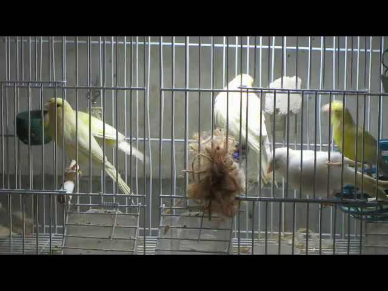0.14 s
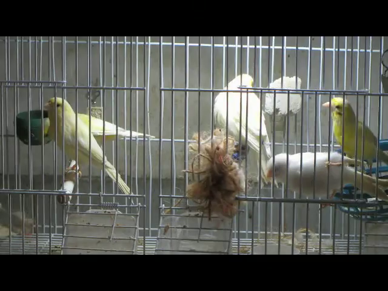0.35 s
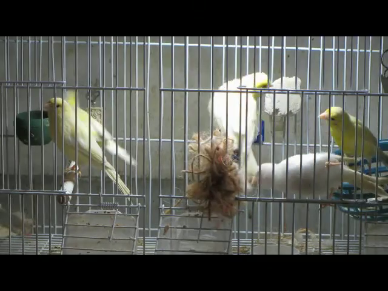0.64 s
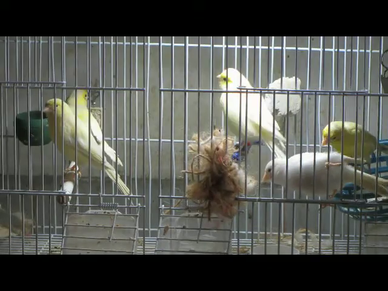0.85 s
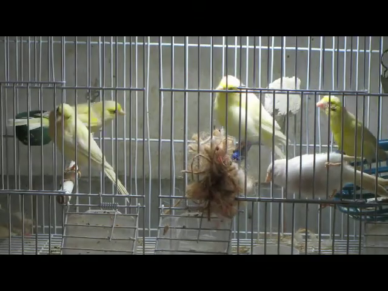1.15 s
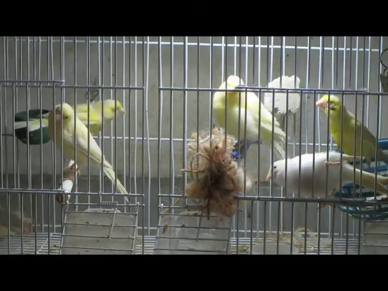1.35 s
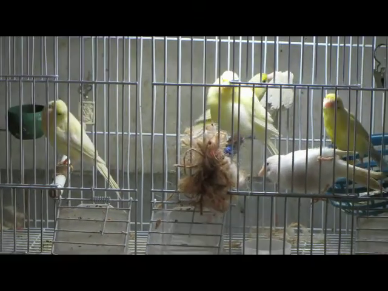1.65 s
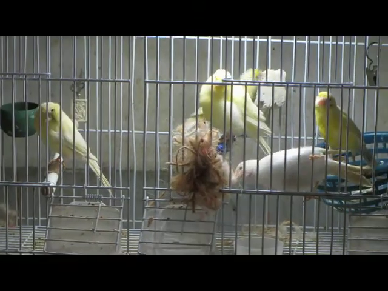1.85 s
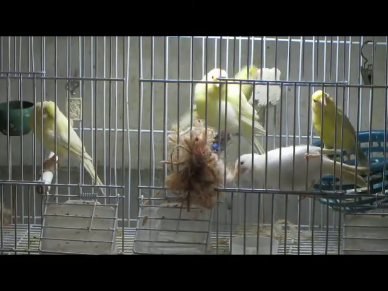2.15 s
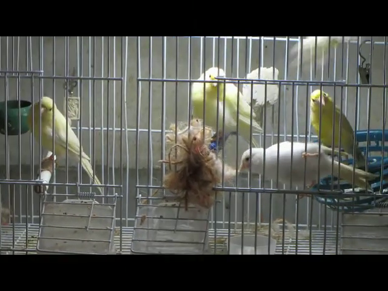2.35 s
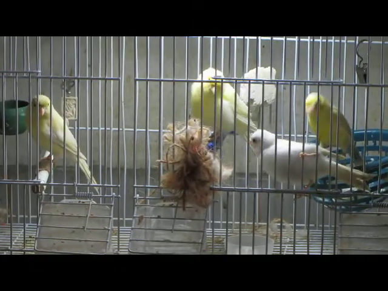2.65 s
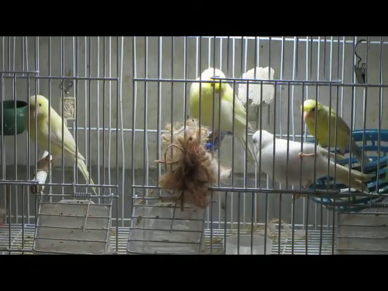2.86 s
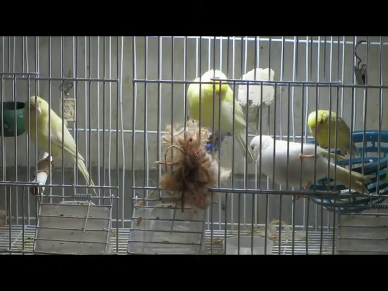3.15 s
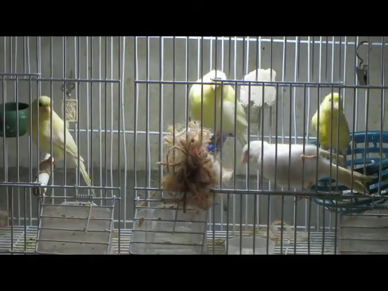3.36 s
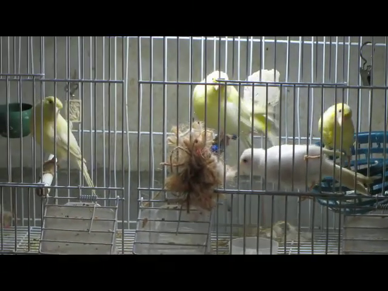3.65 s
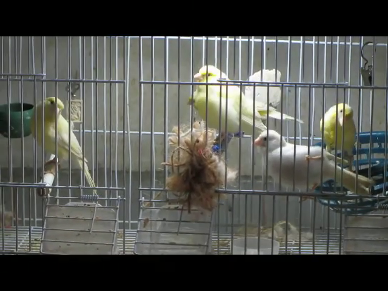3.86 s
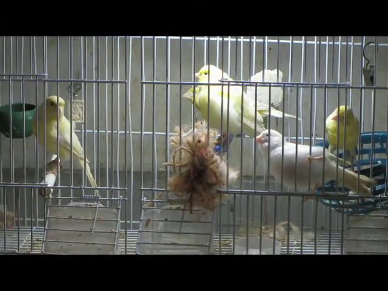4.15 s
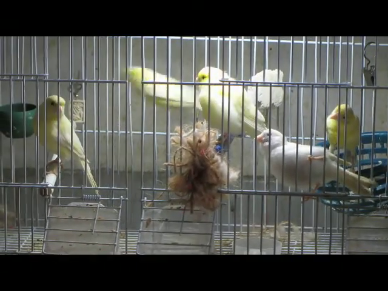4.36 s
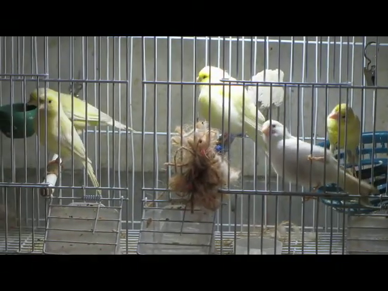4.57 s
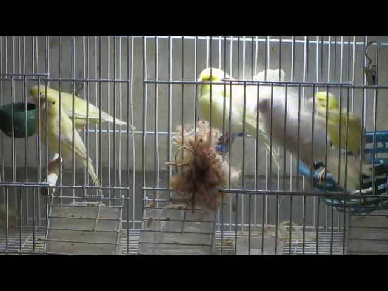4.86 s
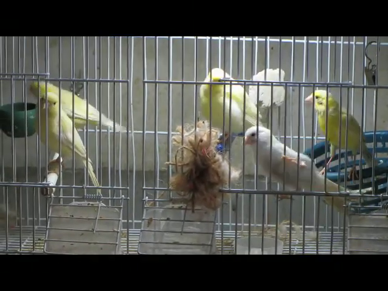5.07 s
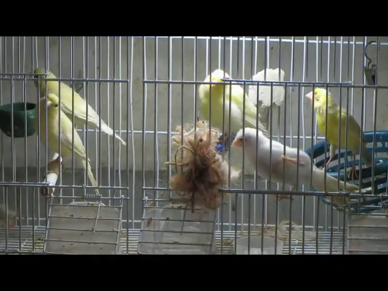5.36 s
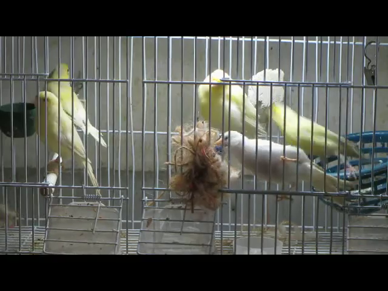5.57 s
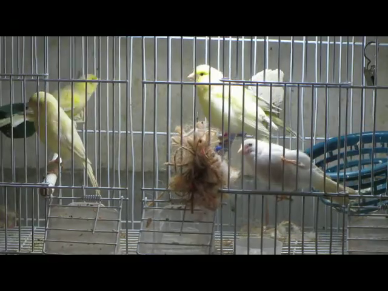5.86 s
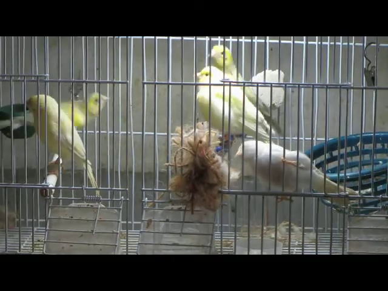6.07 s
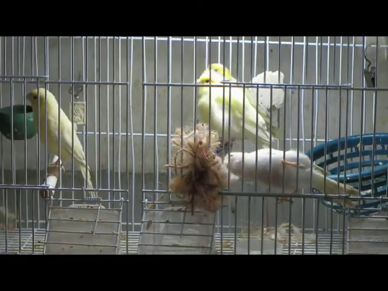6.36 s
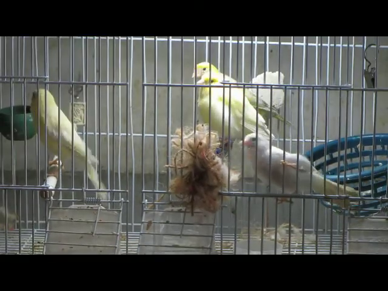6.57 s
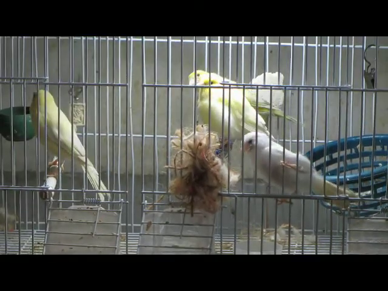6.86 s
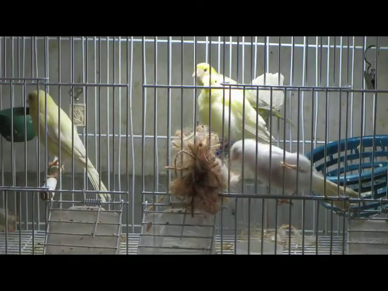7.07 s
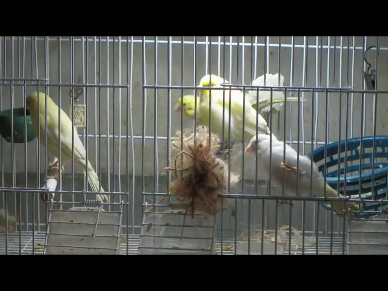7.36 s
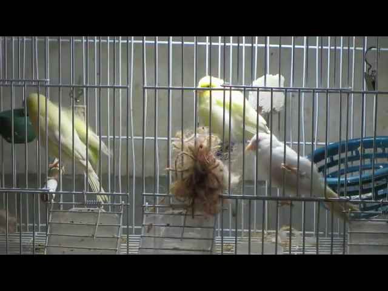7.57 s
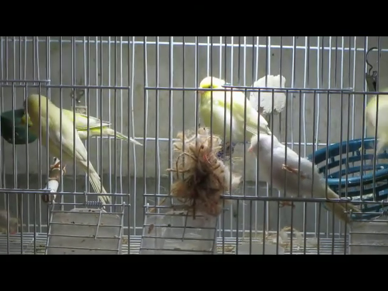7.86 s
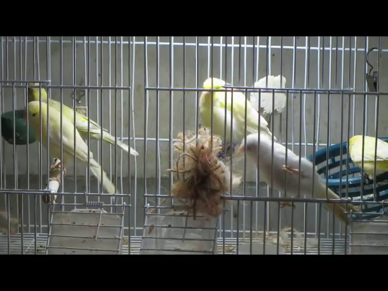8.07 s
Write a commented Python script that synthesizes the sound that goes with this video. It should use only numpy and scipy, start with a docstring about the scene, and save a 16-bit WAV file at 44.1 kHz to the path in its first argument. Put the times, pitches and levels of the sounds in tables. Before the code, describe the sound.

Short, high cheeps from a few caged canaries overlap from the start, mixed with piercing little alarm notes and soft feather rustling. A held whistle sounds near the beginning and again after halfway, where wing beats and scratches on the cage wire lead into a raspy twitter. The chirping briefly eases and resumes. The microphone is near the cage in a small room with short echoes, a few faint knocks and a steady low rumble.

```python
"""Canaries call in wire cages in a small, hard-walled room, over a low rumble and a faint hum.
Rising chirps, nearly pure tones of the syrinx, start at once and recur to the end. Thin high notes and a
long whistle follow, then wings flutter; from 1.6 s both sides of a syrinx sound sharp two-voiced alarms.
Towards 5 s feet scrape the wires, then come a second long whistle and a hoarse, falling twitter.
The calls thin out after 6 s, and pick up again from 7 s over the soft shuffling of feathers."""
import sys
import numpy as np
from scipy import signal
from scipy.fft import rfft, irfft, next_fast_len
from scipy.io import wavfile
from scipy.ndimage import map_coordinates

SR = 44100
rng = np.random.default_rng(int(sys.argv[2]) if len(sys.argv) > 2 else 0)


def unload_audio(sound):
    """Save the sound as a 16-bit wav file, at the path given as the first command line argument."""
    columns = np.transpose(np.atleast_2d(sound))
    # keep every value between -1 and 1, then stretch to whole-number steps
    steps = np.round(np.clip(columns, -1, 1) * 32767)
    wavfile.write(sys.argv[1], SR, steps.astype(np.int16))


N = 362061

# Spectrum of scraped wires, also used for breath. Each row: frequency in Hz, relative density in dB.
HISS_SPECTRUM = [(300, -25), (900, 12.5), (2000, 7), (4000, 5), (6500, 4.5), (10000, -3), (12500, -19),
                 (16000, -15)]


def amp(db):
    """Convert decibels to an amplitude ratio."""
    return 10 ** (np.asarray(db) / 20)


def unit(x):
    """Normalise to an rms of 1."""
    return x / np.sqrt(np.mean(x ** 2) + 1e-20)


def along(points, hz):
    """Interpolate (Hz, value) points on a logarithmic frequency axis."""
    f, v = np.transpose(points)
    return np.interp(np.log(hz + 1), np.log(f + 1), v)


def clock(length):
    """Sample times over a length in seconds."""
    return np.arange(int(length * SR)) / SR


def wobble(t, rate):
    """Smooth random modulation: a spline through `rate` Gaussian knots a second."""
    return map_coordinates(rng.standard_normal(int(t[-1] * rate) + 4), [t * rate])


def filtered(x, response):
    """Linear filtering: multiply the spectrum by a frequency response."""
    n = x.shape[-1]
    padded = next_fast_len(n + 4096)
    return irfft(rfft(x, padded) * response(np.fft.rfftfreq(padded, 1 / SR)), padded)[..., :n]


def room_response(build_s=0.001, early_share=0.17, first_s=0.0012, last_s=0.016, echoes=7):
    """Reverberation: discrete reflections off near walls and a diffuse, exponentially decaying tail."""
    # Each row: frequency in Hz, reverberation time (t60) in seconds.
    decay_times = [(500, 0.17), (3000, 0.21), (6500, 0.2), (12000, 0.12)]
    hz, t, spectrum = signal.stft(rng.standard_normal((2, SR // 3)), SR, nperseg=256)
    fade = amp(-60 * t / along(decay_times, hz)[:, None]) * (1 - np.exp(-t / build_s))
    tail = unit(signal.istft(spectrum * fade, SR, nperseg=256)[1]) / np.sqrt(SR // 3)
    walls = np.zeros_like(tail)
    arrival = rng.uniform(first_s, last_s, echoes) * SR
    for side in walls:  # each echo meets the two microphones a little apart
        side[np.abs(arrival + rng.normal(0, 2, echoes)).astype(int)] = rng.uniform(0.14, 1, echoes)
    return np.sqrt(1 - early_share) * tail + np.sqrt(early_share) * walls / np.linalg.norm(walls[0])


def place(out, start, sound, pan_db, room_db):
    """Convolution with the direct path and this spot's own echoes; pan_db is left over right."""
    path = amp(room_db) * room_response()
    path[[0, 1], [1, 0]] += 1  # the direct sound reaches the right microphone a sample earlier
    heard = signal.fftconvolve(sound[None], path, axes=1) * amp([[pan_db / 2], [-pan_db / 2]])
    first = max(0, round(start * SR))
    out[:, first:first + heard.shape[1]] += heard[:, :N - first]


def room_noise(air_db=-43, hum_hz=105, hum_db=-54, drone_hz=300, drone_db=-62, pan_db=2):
    """Partly coherent rumble and hiss, with a hum and a drone that waver in amplitude and phase."""
    # Each row: frequency in Hz, relative density of the rumble in dB.
    air_spectrum = [(15, -49), (25, -9.5), (66, -13), (107, -1.5), (156, -10.5), (193, -4), (445, -15.5),
                    (567, -10), (945, -14), (1080, -11.5), (1710, -25), (2490, -19), (3630, -34),
                    (9550, -39.5), (15500, -56)]
    # Each row: frequency in Hz, correlation between left and right.
    coherence = [(60, 0.56), (180, 0.02), (550, 0.35), (1650, 0.44), (4970, 0.051), (15000, 0.027)]

    def mid_side_gains(hz):
        """The more coherent a band, the more of its power lies in the mid signal."""
        angle = np.arccos(along(coherence, hz)) / 2
        return amp(along(air_spectrum, hz)) * [np.cos(angle), np.sin(angle)]

    t = np.arange(N) / SR
    mid, side = filtered(rng.standard_normal((2, N)), mid_side_gains)
    noise = amp(air_db + 0.092 * wobble(t, 9.1)) * unit(np.array([mid + side, mid - side]))
    for hz, db in [(hum_hz, hum_db), (drone_hz, drone_db)]:
        noise += amp(db + 3.6 * wobble(t, 11)) * np.sin(2 * np.pi * hz * t + 1.3 * wobble(t, 9.9))
    return noise * amp([[pan_db / 2], [-pan_db / 2]])


def wings(out, beat_hz=23, beat_db=2, gain_db=-1, fidget_db=2.5):
    """Feather noise is amplitude-modulated by the wing beat; bursts and shuffling add in power."""
    # Bursts of wing beats. Each row: start in seconds, length in seconds, relative level in dB.
    flutters = [(0.685, 0.4, -43.5), (3.908, 0.084, -41.5), (4.579, 0.089, -40), (4.93, 0.11, -39),
                (5.878, 0.36, -45)]
    # Shuffling and preening. Each row: time in seconds, relative level in dB.
    shuffle_levels = [(0, -47.5), (4.5, -47), (5.4, -50), (6.9, -52.5), (7.4, -52.5), (8.2, -48.5)]
    # Each row: frequency in Hz, relative density of the rustle in dB.
    feather_spectrum = [(100, 5.5), (400, -3), (1000, 4.5), (2000, 6), (4000, -3.5), (9000, -3.5),
                        (15000, -28.5)]
    t = np.arange(N) / SR
    beat = np.sin(2 * np.pi * beat_hz * t + 2 * wobble(t, 6))
    rustle = rng.standard_normal(N) * amp(beat_db * beat + 2.5 * wobble(t, 300))
    rustle = unit(filtered(rustle, lambda hz: amp(along(feather_spectrum, hz))))
    bursts = sum(amp(db) * np.sin(np.pi * np.clip((t - start) / length, 0, 1))
                 for start, length, db in flutters)
    shuffle = amp(np.interp(t, *np.transpose(shuffle_levels)) + fidget_db * wobble(t, 14))
    place(out, 0, rustle * np.hypot(bursts, shuffle) * amp(gain_db), pan_db=0.5, room_db=-1.5)


def knocks(out, t60=0.16, attack_s=0.00059):
    """Damped free vibration: a knocked perch or cage rings briefly on one low mode."""
    # Each row: start in seconds, level in dB, mode frequency in Hz.
    impacts = [(.765, -38.5, 975), (2.171, -37, 170), (2.229, -36.5, 190), (3.949, -35, 1044),
               (6.09, -39.5, 1050), (7.431, -33, 977)]
    t = clock(0.2)
    for start, db, hz in impacts:
        ring = np.sin(2 * np.pi * hz * t + 0.52 * wobble(t, 99))
        envelope = amp(db - 60 * t / t60) * (1 - np.exp(-t / attack_s))
        place(out, start, envelope * ring, pan_db=1, room_db=0)


def landings(out, attack_s=0.0027, grit_db=4):
    """Friction noise: claws and feathers scrape the wires in a gritty, decaying burst."""
    # Each row: start in seconds, level in dB, decay time (t60) in seconds.
    contacts = [(.821, -41, 0.34), (2.673, -26, 0.017), (2.866, -35, 0.17), (4.18, -26.5, 0.046),
                (4.608, -42, 0.32), (4.702, -38.5, 0.13), (4.818, -31, 0.25), (4.91, -30, 0.17),
                (4.968, -26, 0.11), (6.76, -41.5, 0.097)]
    t = clock(0.81)
    for start, db, t60 in contacts:
        grit = rng.standard_normal(len(t)) * amp(grit_db * wobble(t, 600))
        scrape = unit(filtered(grit, lambda hz: amp(along(HISS_SPECTRUM, hz))))
        envelope = amp(db - 60 * t / t60) * (1 - np.exp(-t / attack_s))
        place(out, start, envelope * scrape, pan_db=1.5, room_db=-1.5)


def syrinx(hz, overtones_db):
    """Source and filter: a tone follows a pitch curve, and throat and beak colour its overtones."""
    # Each row: frequency in Hz, gain of an overtone in dB.
    beak_response = [(5000, 0), (7000, -5), (9300, -0.5), (10700, -4.5), (12000, -15.5), (15000, -19)]
    phase = 2 * np.pi * np.cumsum(hz) / SR
    overtones = sum(amp(db + along(beak_response, k * hz)) * (k * hz < SR / 2) * np.sin(k * phase)
                    for k, db in enumerate(overtones_db, 2))
    return np.sin(phase) + overtones


def twitter(out, end_hz=5240, bend=1.2, swell_db=13.5, roughness=0.0062, edge_s=0.0022):
    """Falling glides: a squabbling voice, hoarse with pitch jitter, swells as it slides down."""
    # Each row: start in seconds, length in seconds, top pitch in Hz, final level in dB.
    slides = [(5.381, .058, 7400, -32.5), (5.448, 0.047, 7270, -29), (5.508, 0.055, 8040, -29)]
    for start, length, top_hz, db in slides:
        t = clock(length)
        height = (1 - t / length) ** bend
        hz = (end_hz + (top_hz - end_hz) * height) * (1 + roughness * wobble(t, 628))
        edges = np.minimum(np.minimum(t, length - t) / edge_s, 1)
        envelope = amp(db - swell_db * height) * edges
        place(out, start, envelope * syrinx(hz, [-26]), pan_db=3.5, room_db=3)


def thin_notes(out, sag_hz_per_s=410, third_db=-8):
    """Soft, nearly level contact notes: frequency jitter makes the low ones hoarse, the high stay pure."""
    # Each row: start and length in seconds, pitch in Hz, level in dB, second harmonic at source in dB.
    notes = [(0.173, .042, 4860, -33, -36), (0.214, 0.12, 4865, -22, -32), (2.172, 0.065, 4430, -28.5, -19),
             (2.353, .1, 4180, -29, -14), (2.441, 0.035, 4846, -24, -7), (4.694, 0.033, 4750, -30, -37),
             (4.727, 0.12, 4866, -23, -46), (6.384, 0.048, 4360, -39, -2.5),
             (6.433, .059, 4833, -29, -11.5)]
    # Each row: pitch in Hz, jitter as a share of the pitch.
    jitter = [(4400, 0.037), (4800, 0.011), (4880, 0.0012)]
    for start, length, note_hz, db, second_db in notes:
        t = clock(length)
        glide = note_hz - sag_hz_per_s * (t - length / 2)
        hz = glide * (1 + along(jitter, note_hz) * wobble(t, 500))
        voice = syrinx(hz, [second_db, second_db + third_db])
        place(out, start, amp(db) * np.sin(np.pi * t / length) * voice, pan_db=4.5, room_db=-7)


def alarms(out, lower_hz=5320, length=0.0301, lead_s=0.0095, drop=0.096, settle_s=0.008, gain_db=-1):
    """Nonlinear coupling: both sides of the syrinx fall together, adding sum and difference tones."""
    # Each row: time in seconds (lead_s after the onset), relative level in dB,
    # upper pitch at mid-note in Hz, lower voice against the upper in dB.
    calls = [(1.602, -15, 6610, -3), (1.931, -26.5, 6490, 1.5), (2.9008, -24, 6620, -22),
             (4.2583, -24.5, 6560, -5), (5.3058, -12.5, 6710, -5), (5.421, -26, 6540, 5),
             (6.0906, -14, 6414, -3), (7.9644, -18.5, 6660, -2)]
    t = clock(length)
    fall = 1 + drop * (np.exp(-t / settle_s) - np.exp(-length / 2 / settle_s))
    for time, db, upper_hz, lower_db in calls:
        upper, lower = (2 * np.pi * np.cumsum(hz * fall * (1 + 0.008 * wobble(t, 900))) / SR
                        for hz in (upper_hz, lower_hz))
        upper_voice = np.sin(upper) + amp(-40) * np.sin(2 * upper)
        lower_voice = np.sin(lower) + 0.015 * np.sin(2 * lower)
        combination_tones = 0.14 * np.sin(2 * upper - lower) + 0.05 * np.sin(upper + lower)
        voice = upper_voice + amp(lower_db) * (lower_voice + combination_tones)
        envelope = amp(db + gain_db) * np.sin(np.pi * t / length) ** 2
        place(out, time - lead_s, envelope * voice, pan_db=3.5, room_db=-4)


def whistles(out, scoop_from=0.815, creep_hz=125, swell_db=6, attack_s=0.0011, release_s=0.015):
    """Interference: a note scoops up, then creeps higher as it swells; a wall echo makes it beat."""
    # Each row: start in seconds, length in seconds, final pitch in Hz, relative level in dB.
    notes = [(.036, .072, 3190, -22), (2.044, .085, 3500, -30), (4.408, .08, 3140, -24),
             (4.552, .095, 3150, -23), (.414, .295, 3102, -17), (4.937, .28, 3098, -16)]
    # Short whistles scoop faster. Each row: length in seconds, time constant in seconds.
    scoop_times = [(.08, 0.0183), (.27, .027)]
    echo_delay, echo_gain = round(0.01975 * SR), 0.55
    for start, length, end_hz, db in notes:
        t = clock(length)
        remaining = 1 - t / length
        scoop_s = np.interp(length, *np.transpose(scoop_times))
        scoop_hz = (end_hz - creep_hz - scoop_from * end_hz) * np.exp(-t / scoop_s)
        hz = end_hz - creep_hz * remaining - scoop_hz + wobble(t, 54)
        far = db < -20  # faint birds sit farther off: less direct sound, more room
        level_db = db - 1.5 - 3 * far - swell_db * remaining + wobble(t, 31.5)
        edges = np.minimum(t / attack_s, 1) * np.minimum((length - t) / release_s, 1)
        note = amp(level_db) * edges * syrinx(hz, [-46, -42])
        echoed = np.pad(note, (0, echo_delay)) + echo_gain * np.pad(note, (echo_delay, 0))
        place(out, start, echoed, pan_db=-2, room_db=-3 + 7 * far)


def chirps(out, ceiling_hz=5300, least_rise=0.28, linger=0.347, waver=0.0082, breath_db=-28):
    """Frequency sweeps level off near the top of the bird's range; pushed high, the voice rasps."""
    # Each row: start and length in seconds, target pitch in Hz, relative level in dB,
    # base level of the overtones in dB.
    calls = [(0.0, 0.014, 5050, -26, -12), (0.093, 0.0093, 3364, -20, -22),
             (0.203, 0.022, 3550, -21.0, -10), (0.291, 0.008, 4720, -21, -10),
             (0.343, 0.021, 4840, -19.5, -11), (0.378, 0.015, 2010, -34, -26),
             (0.575, 0.021, 3535, -29, 0.5), (0.857, 0.011, 3090, -28, -12),
             (0.882, 0.019, 3645, -18.5, -17.0), (0.981, 0.015, 5080, -24.0, -13),
             (1.016, 0.017, 3620, -30, -10.0), (1.067, 0.028, 3270, -28.0, -14.0),
             (1.113, 0.021, 3170, -22.5, -16), (1.148, 0.014, 3610, -24.5, -13),
             (1.211, 0.025, 2270, -40.5, -22.0), (1.246, 0.026, 3620.0, -21.5, -15),
             (1.255, 0.029, 5240, -27.5, -9.5), (1.384, 0.029, 3520, -15, -14),
             (1.495, 0.016, 4510, -31, -16), (1.529, 0.017, 3320, -31.0, -22),
             (1.678, 0.023, 3240, -38, -11), (1.721, 0.0091, 3910, -27.5, -7.5),
             (1.77, 0.0088, 2120, -41.0, -13), (1.8, 0.019, 5080, -19.5, -9.5),
             (1.873, 0.013, 5280, -28.5, -6.5), (1.969, 0.013, 3360, -27, -16),
             (2.009, 0.014, 5020, -27, -12), (2.174, 0.028, 3474, -19, -14.5),
             (2.256, 0.042, 3437, -17.0, -11.5), (2.314, 0.037, 4870, -21.5, -8.5),
             (2.466, 0.022, 4900, -20, -11.5), (2.573, 0.0093, 4300.0, -37.0, -25.0),
             (2.585, 0.034, 3440, -16.0, -19), (2.73, 0.015, 3540, -31, -23),
             (2.816, 0.027, 3510, -18.5, -12), (2.836, 0.043, 3234, -21, -10),
             (2.888, 0.026, 3343, -16.5, -15.5), (2.96, 0.021, 4770, -17, -10.5),
             (3.074, 0.034, 5350, -16.5, -15), (3.137, 0.025, 3580, -19.0, -11.5),
             (3.239, 0.03, 4820, -18, -11.0), (3.3, 0.012, 3500.0, -27, -14.0),
             (3.362, 0.036, 4380, -19, -13.0), (3.401, 0.028, 3340, -20, -15),
             (3.478, 0.013, 5220.0, -27.5, -9), (3.52, 0.028, 3870, -38, -6),
             (3.553, 0.035, 4990, -24, -11.5), (3.66, 0.027, 3350, -34, -9),
             (3.834, 0.029, 3545, -19.5, -9), (3.92, 0.024, 3302, -16.5, -19.0),
             (4.041, 0.009, 2770, -30, -10), (4.061, 0.045, 3580, -16.5, -12.5),
             (4.182, 0.031, 5870, -16, -15.0), (4.262, 0.038, 3620, -23.5, -8.5),
             (4.357, 0.026, 3450, -17.5, -17.5), (4.437, 0.012, 4700.0, -33, -25.0),
             (4.469, 0.021, 4980, -27.5, -9.5), (4.901, 0.012, 2025, -33.0, 2),
             (5.194, 0.028, 5280, -20.5, -17), (5.351, 0.018, 2945, -36.5, -1),
             (5.54, 0.033, 3246, -20.0, -15), (5.653, 0.05, 3460, -15.5, -20.5),
             (5.692, 0.014, 4900, -20.5, -9), (5.766, 0.033, 5500, -19, -16.5),
             (5.812, 0.028, 5280, -15.5, -16.5), (5.943, 0.026, 4630, -16, -15.5),
             (6.002, 0.028, 3590, -25, -8), (6.109, 0.029, 5200, -16.5, -14),
             (6.209, 0.031, 3537, -23.0, -10), (6.496, 0.019, 3166, -28.5, 5),
             (6.989, 0.01, 4520, -26, -18.5), (7.041, 0.022, 4100, -29, 1.5),
             (7.069, 0.031, 3180, -27.5, -17), (7.113, 0.0095, 4320, -29.5, -8.5),
             (7.231, 0.018, 3300, -29.5, -20), (7.276, 0.022, 3280.0, -18.5, -14.5),
             (7.324, 0.029, 3550, -24.5, -10.0), (7.442, 0.033, 5010, -26, -7.0),
             (7.62, 0.029, 3395, -16, -15), (7.765, 0.027, 5110.0, -16, -16.5),
             (7.834, 0.017, 5120, -31.5, -15), (7.926, 0.013, 3610, -27.0, -4),
             (8.098, 0.017, 5110, -29.5, -8), (8.156, 0.013, 5050, -30, -10.5)]
    # A louder cheep rises sooner and holds its note. Each row: level in dB, factor on the bend.
    hold = [(-30, 0.746), (-19.5, 1.035), (-14, 1.45)]
    # Faint birds sit farther off. Each row: level in dB, loss of direct sound in dB.
    distance_loss = [(-26, 2), (-25.5, 1.14), (-17, 0.96)]
    for start, length, top_hz, db, overtones_db in calls:
        t = clock(length)
        progress = t / length
        push = np.interp(top_hz, (3630, 4610), (0, 1))  # a bird pushes harder the higher it aims

        def by_push(easy, hard):
            """Interpolate from an easy cheep to a fully pushed sweep."""
            return easy + push * (hard - easy)

        start_hz = min(by_push(2439, 2770), (1 - least_rise) * top_hz)
        bend = by_push(2.65, 0.98) * np.interp(db, *np.transpose(hold)) ** (1 - push)  # 1 is straight
        early_rise = np.sin(np.pi / 2 * np.minimum(progress / 0.8, 1)) ** 2
        rise = progress + linger * push * (early_rise - progress)  # pushed, it lingers at the top
        sweep = top_hz + (start_hz - top_hz) * np.abs(1 - rise) ** bend
        sweep = sweep / (1 + (sweep / ceiling_hz) ** 20) ** (1 / 20)  # soft limit of the range
        hz = sweep * (1 + waver * wobble(t, 400) + by_push(0.0063, 0.041) * wobble(t, 1000))
        swell = np.abs(np.sin(np.pi * progress ** by_push(1.137, 1.16))) ** 0.85  # peaks past halfway
        flicker_db = by_push(1, 3) * wobble(t, 303)
        hiss = rng.standard_normal(len(t))
        breath = filtered(hiss, lambda f: amp(along(HISS_SPECTRUM, f)) * (f > start_hz))
        second_db = overtones_db + by_push(-2.5, -1)
        third_db = min(overtones_db + by_push(-5, -5.5), -12)
        voice = syrinx(hz, [second_db, third_db]) + push * amp(breath_db) * breath
        loss_db = np.interp(db, *np.transpose(distance_loss))
        envelope = swell * amp(db - 0.35 + flicker_db - loss_db)
        pan_db = 1.45 + 0.26 * rng.standard_normal()  # perches scatter about the middle of the flock
        place(out, start, envelope * voice, pan_db, room_db=by_push(-0.5, 1.5) + 2 * loss_db)


def scene():
    """Superposition: the birds and their cages add to the room noise."""
    out = room_noise()
    for source in (chirps, whistles, thin_notes, alarms, twitter, landings, knocks, wings):
        source(out)
    return out


def record(dry, low_cut_hz=29, top_hz=15830):
    """Microphone response: the left is brighter around 8-11 kHz, and both are band-limited."""
    def response(hz):
        """Gain of the left and right channels at each frequency."""
        lean_db = along([(5500, 0.5), (8000, 9.0), (10500, 11.7), (13000, 1.5)], hz)
        band = (hz < top_hz) * (1 - 1 / (1 + (hz / low_cut_hz) ** 8))
        return amp([lean_db / 2, -lean_db / 2]) * band

    return filtered(dry, response)


dry = scene()
out = record(dry)
unload_audio(out)
```